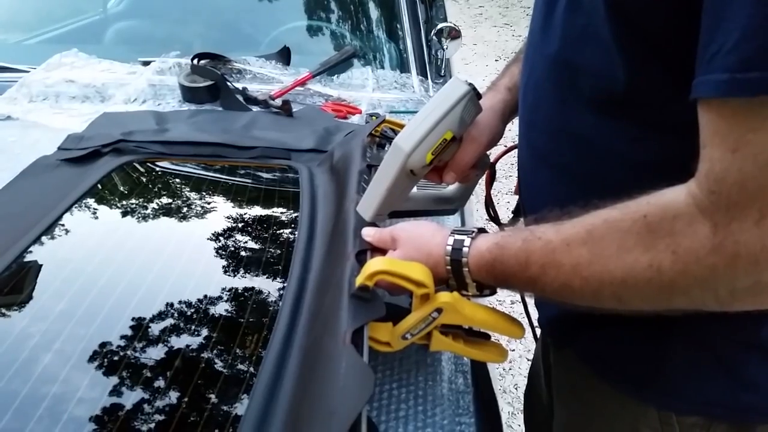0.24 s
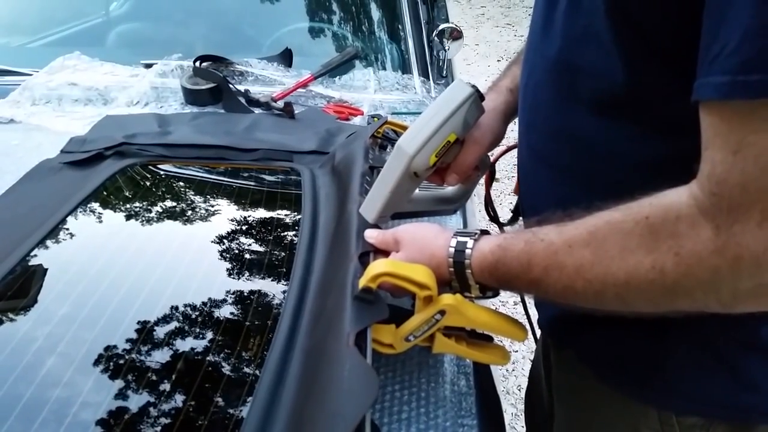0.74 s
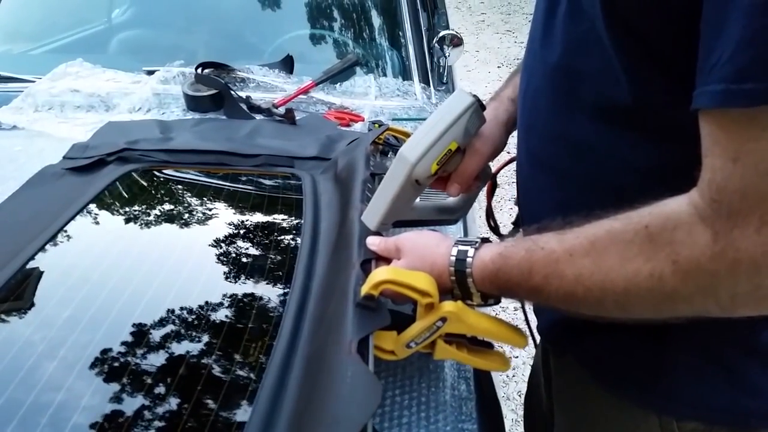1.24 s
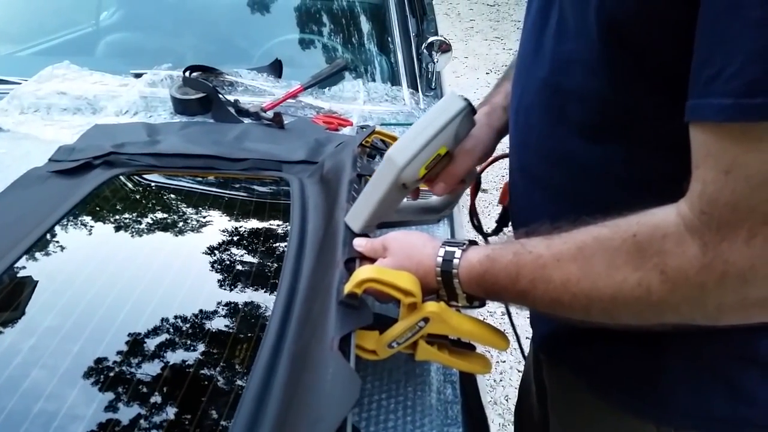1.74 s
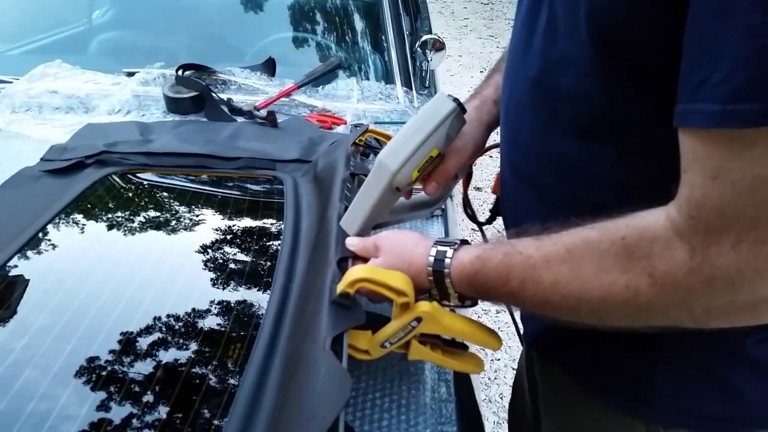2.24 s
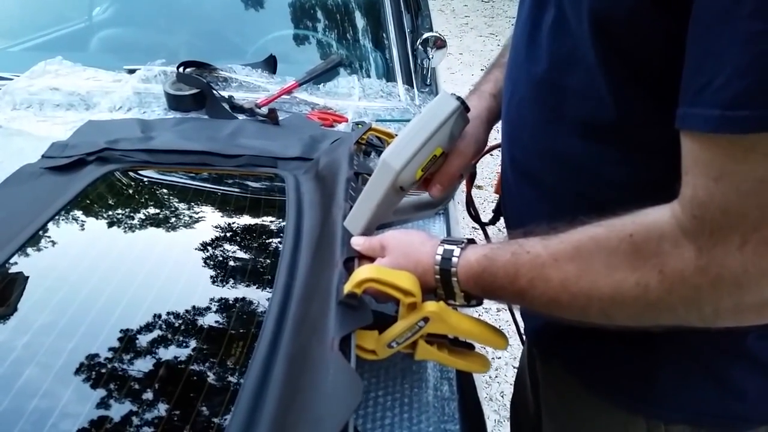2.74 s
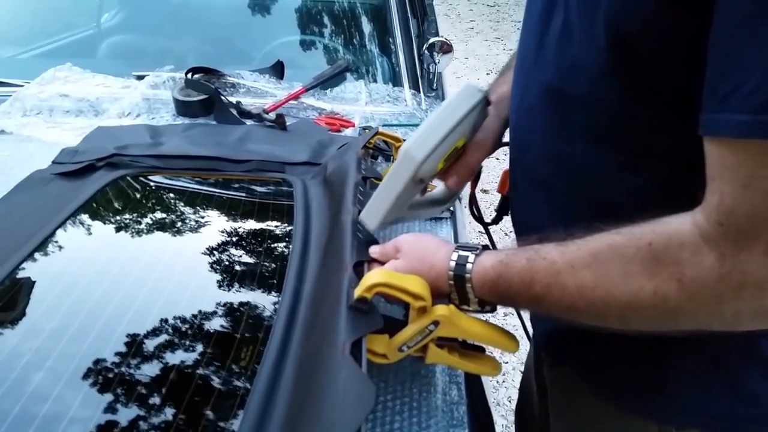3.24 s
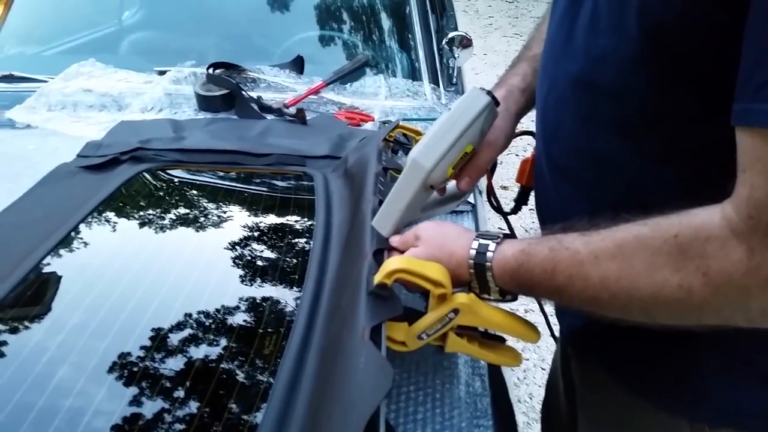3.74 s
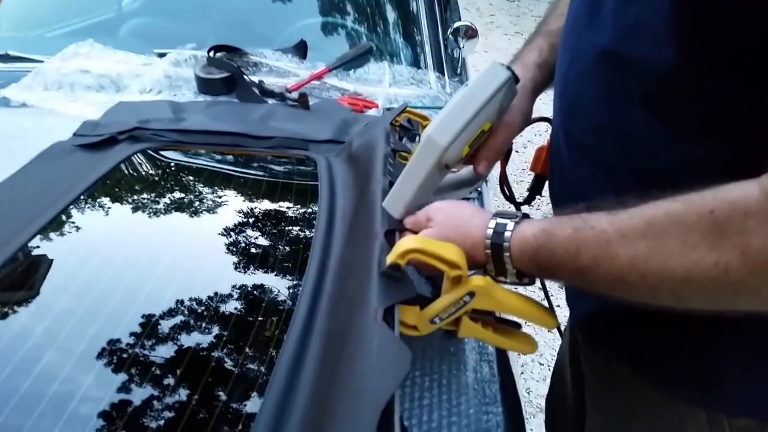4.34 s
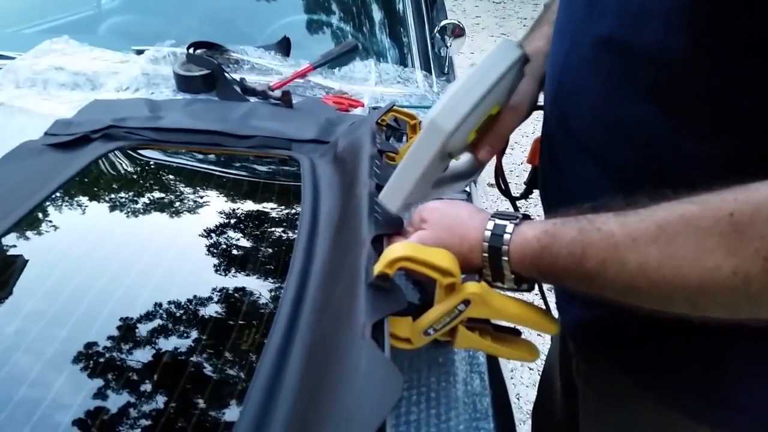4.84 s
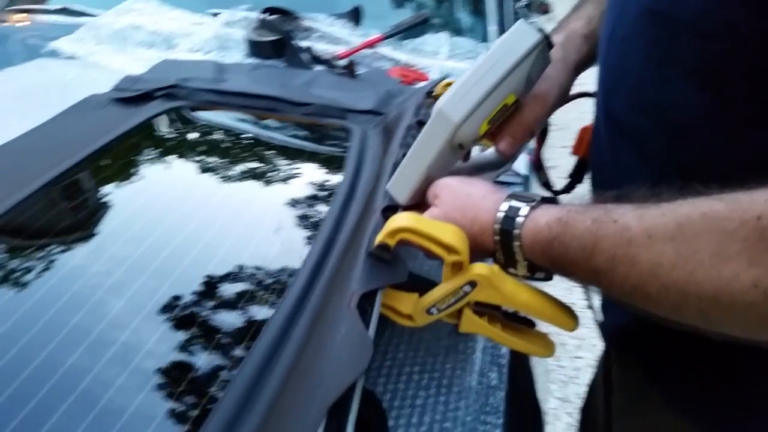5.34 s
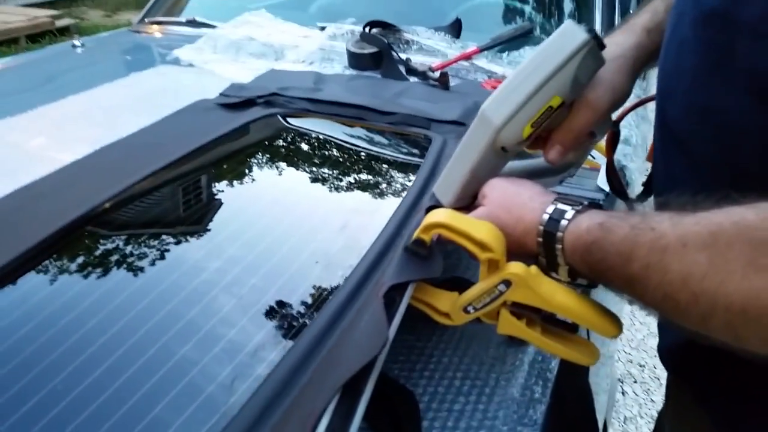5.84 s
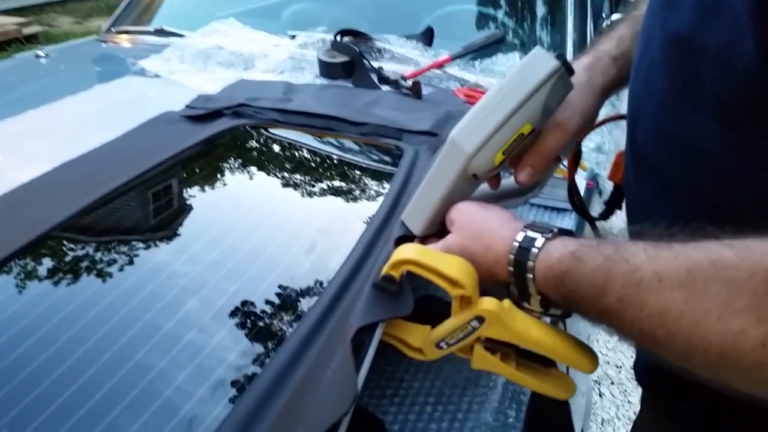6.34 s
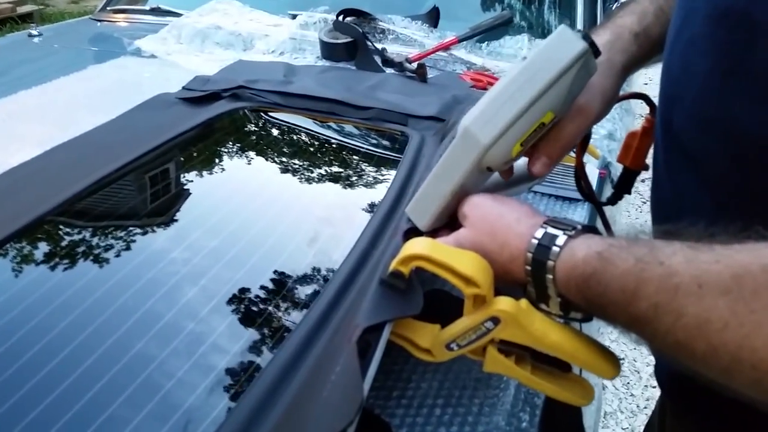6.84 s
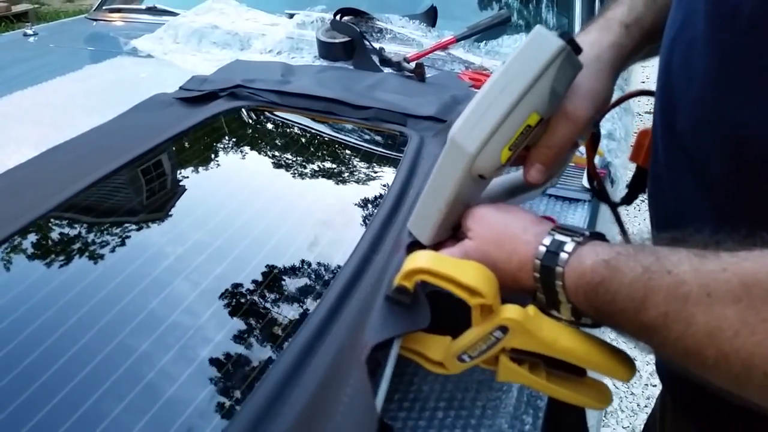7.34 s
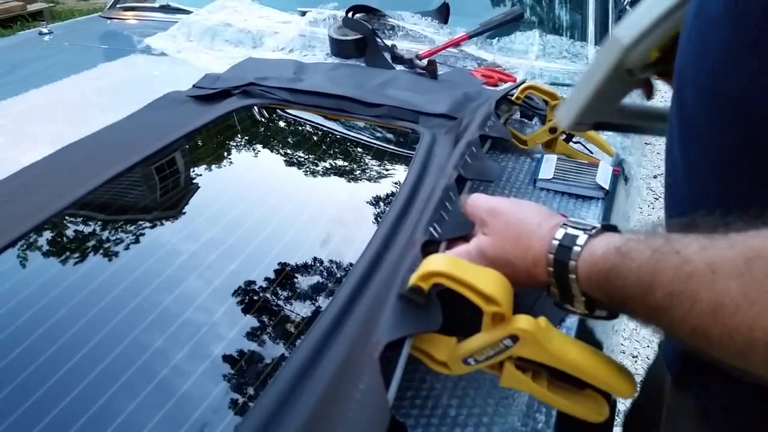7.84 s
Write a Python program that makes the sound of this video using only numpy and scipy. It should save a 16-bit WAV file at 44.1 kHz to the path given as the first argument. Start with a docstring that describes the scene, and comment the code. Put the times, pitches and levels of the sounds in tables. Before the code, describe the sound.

At the mouth of a garage, a close electric staple gun drives five evenly spaced staples into a vinyl car top. The hard, slightly overloaded snaps thump the car's panels and leave a short echo. Small clicks, dull bumps and vinyl rubbing fill the gaps, with one firmer knock before the last shot. Behind this lie a faint low rumble, buzzing insects and a far-off passing car, all dropping away after each snap.

```python
"""At the mouth of a garage, an electric staple gun fires five times into the vinyl top of a car.
The trigger clicks, a hard snap and a thump ring the car's panels, and the plunger clacks back.
In between, hands bump and rub the vinyl and the gun's nose ticks on it; the walls echo it all.
The town rumbles, insects call and a distant car goes by. An automatic volume control turns
everything down at each shot, so these outdoor sounds drop away and then swell back."""
import sys
import numpy as np
from scipy import signal
from scipy.fft import rfft, irfft
from scipy.io import wavfile
from scipy.ndimage import uniform_filter1d, minimum_filter1d, map_coordinates

SR = 44100
rng = np.random.default_rng(int(sys.argv[2]) if len(sys.argv) > 2 else 0)


def to_wav(sig):
    """Store sig (one row per channel, or 1-D mono) as 16-bit WAV at the path in sys.argv[1].

    Samples outside -1..1 are clipped; the rate is SR.
    """
    pcm = np.clip(np.atleast_2d(sig), -1, 1) * 32767
    pcm = np.round(pcm).astype(np.int16)
    wavfile.write(sys.argv[1], SR, pcm.T)  # frames by channels


N = 357142
TIME = np.arange(int(.8 * SR)) / SR  # the clock of one short sound, in seconds


def gain(db):
    """Turn decibels into a number to multiply a sound by."""
    return 10 ** (np.asarray(db) / 20)


def add(out, start_s, sound):
    """Mix a sound in from its start time."""
    i = max(int(start_s * SR), 0)
    out[:, i:i + sound.shape[-1]] += sound[..., :N - i]


def colour(x, tone, size=4096):
    """Shape a sound with a table of pitches and levels; white noise keeps its overall power."""
    hz, db = np.transpose(tone)
    curve = gain(np.interp(np.log(np.arange(size // 2 + 1) * SR / size + 1), np.log(hz), db))
    # build the filter so that it never rings before the sound arrives
    cepstrum = irfft(np.log(curve)) * (1 + np.sign(np.fft.fftfreq(size)))
    response = irfft(np.exp(rfft(cepstrum)))
    return signal.fftconvolve(x, response[None] / np.linalg.norm(response))[:, :x.shape[1]]


def noise(count, alike_hz=500):
    """Stereo noise whose left and right sides are alike below alike_hz."""
    mid, side = rng.standard_normal((2, count))
    side = signal.lfilter(*signal.butter(1, alike_hz, "high", fs=SR), side)
    return np.array([mid + side, mid - side]) / np.sqrt(2)


def wobble(rate_hz, count=len(TIME)):
    """A random wander, mostly between -1 and 1."""
    step = max(int(SR / rate_hz), 1)
    return uniform_filter1d(np.repeat(rng.standard_normal(count // step + 1), step), step)[:count]


def fade(fade_s):
    """Die away by 60 dB in fade_s seconds."""
    return gain(-60 * TIME / fade_s)


def ring(hz, fade_s):
    """One fading note of something struck."""
    return np.sin(2 * np.pi * hz * TIME) * fade(fade_s)


# the low rumble of town and engine (pitch [Hz], level [dB])
RUMBLE_TONE = [(20, -6), (60, 4), (120, 4), (200, -5.5), (300, -12), (600, -26), (1500, -56.5)]
# the rush of tyres on the road (pitch [Hz], level [dB])
TYRE_TONE = [(60, -18.5), (250, 2), (500, -1), (850, 13), (1050, 7.5), (1400, -10.5), (2400, -12.5),
             (3300, -28.5), (6500, -43), (13000, -37.5)]
def traffic(road_m=15, speed_m_s=24, nearest_s=7.05, town_db=-52, engine_db=-34, tyres_db=-38):
    """The town rumbles; one car's engine and tyres grow as it nears and fade as it leaves."""
    nearness = road_m / np.hypot(road_m, speed_m_s * (np.arange(N) / SR - nearest_s))
    rumble = colour(noise(N, alike_hz=160), RUMBLE_TONE) * gain(2.5 * wobble(3.8, N))
    rumble *= np.hypot(gain(town_db), gain(engine_db) * nearness)
    tyres = colour(noise(N, alike_hz=800), TYRE_TONE) * gain([[2], [-2]])  # a little to the left
    return rumble + tyres * gain(tyres_db) * nearness


# the drone of many insects (pitch [Hz], level [dB])
CHORUS_TONE = [(2500, -45), (3500, -13.5), (3950, 4), (4400, 3.5), (4800, 1.5), (5250, -23.5), (6600, -15),
               (7500, -35.5), (14000, -28)]
# the whine of the nearest insect (pitch [Hz], level [dB])
WHINE_TONE = [(3500, -43), (4400, -18.5), (4600, 0.5), (4740, 1.5), (4900, -16.5), (5300, -38.5),
              (8500, -51.5), (9400, -31), (10400, -47), (14000, -24)]
# that insect starts a call (time [s])
CALL_TIMES = [.45, 2.1, 3.35, 5.25, 6.8]
def insects(chorus_db=-65, call_db=-61.5, sharp_share=.029, sag_s=.3):
    """A chorus drones on while the nearest insect calls and rests, its pitch sagging in each call."""
    out = colour(noise(N), CHORUS_TONE) * gain(chorus_db + 1.2 * wobble(60, N))
    whine = colour(noise(N), WHINE_TONE) * gain(call_db + 2 * wobble(90, N))
    corners_s = np.cumsum([0, .3, .62, .45])  # swell, hold, fade
    t = np.arange(int(corners_s[-1] * SR)) / SR
    swell = np.interp(t, corners_s, [0, 1, 1, 0])
    position = np.cumsum(1 + sharp_share * np.exp(-t / sag_s))  # faster at first, so higher
    for s in CALL_TIMES:
        call = np.array([map_coordinates(side, [s * SR + position], mode="mirror") for side in whine])
        add(out, s, swell * call)
    return out * gain([[2], [-2]])  # a little to the left


def thump(hz, fade_s, left_db, lag_s):
    """The padded top gives under a push: a low swing that reaches the right side later."""
    swing = ring(hz, fade_s) * (1 - np.exp(-TIME / .00022))
    return np.array([gain(left_db) * swing, np.interp(TIME - lag_s, TIME, swing, left=0)])


# soft bumps on the car's top (time [s], level [dB])
SOFT_BUMPS = [(.008, -37.5), (1.915, -22), (2.478, -34), (3.44, -22.5), (3.59, -20), (3.956, -21),
              (4.237, -24.5), (7.312, -32)]
def bumps():
    """Hands and gun bump the padding, which answers with a dull thud."""
    out = np.zeros((2, N))
    for s, db in SOFT_BUMPS:
        add(out, s, gain(db) * thump(hz=112, fade_s=.07, left_db=8.5, lag_s=.00019))
    return out


# the tone of the garage's echo (pitch [Hz], level [dB])
ECHO_TONE = [(40, -1.5), (100, 2), (220, 0), (500, -2.5), (1000, -4), (2500, -3), (4400, -8.5), (7000, 4),
             (10000, 2), (14500, 0)]
def garage_echo(x, bass_fade_s=.67, mid_fade_s=.61, treble_fade_s=.42):
    """Sound bounces off the walls: separate echoes blur into a wash, and the bass lasts longest."""
    bounces_db = 3 * wobble(220) + 7 * np.exp(-TIME / .06) * wobble(2500)
    wash = noise(len(TIME), alike_hz=296) * gain(bounces_db)
    bass, below_treble, treble = (signal.sosfilt(signal.butter(2, hz, kind, fs=SR, output="sos"), wash)
                                  for hz, kind in [(300, "low"), (6000, "low"), (6000, "high")])
    mid = below_treble - bass
    tail = bass * fade(bass_fade_s) + mid * fade(mid_fade_s) - treble * fade(treble_fade_s)
    build_up = np.clip((TIME - .004) / .015, 0, 1)
    tail = colour(tail * build_up, ECHO_TONE)
    return signal.fftconvolve(x, tail / np.sqrt(np.sum(tail ** 2) / 2), axes=1)[:, :N]


def chatter(lead_s, rise_s, stay_s, fall_s, rough_db):
    """A crowd of tiny hits builds up to the contact at lead_s, stays a moment and dies away."""
    t = TIME - lead_s
    shape = np.exp(np.minimum(t, 0) / rise_s - np.maximum(t - stay_s, 0) / fall_s)
    hits = noise(len(t), alike_hz=300) * shape * gain(rough_db * wobble(2500))
    return hits * np.sqrt(np.sum(shape ** 2) / np.mean(np.sum(hits ** 2, axis=1)))


# a light click of the gun (pitch [Hz], level [dB])
CLICK_TONE = [(100, -13), (1000, 0.5), (2600, 8.5), (4200, 5), (6000, -15.5), (8500, -7), (11500, 4.5),
              (14500, -1.5)]
# a knock on the strip under the vinyl that takes the staples (pitch [Hz], level [dB])
STRIP_TONE = [(60, -12.5), (300, -9), (600, -4), (950, 5.5), (1350, -3), (1800, -17.5), (2700, -18.5),
              (3800, -37), (14000, -49.5)]
TICK_LEAD_S = .004
def tick(click_db, knock_db):
    """One light contact: a bright click from the gun and a dull knock from the strip."""
    contact = chatter(TICK_LEAD_S, rise_s=.0012, stay_s=.00041, fall_s=.0013, rough_db=1)
    return gain(click_db) * colour(contact, CLICK_TONE) + gain(knock_db) * colour(contact, STRIP_TONE)


# the gun's nose touches down (time [s], click level [dB], knock level [dB])
NOSE_TAPS = [(0.0487, -46, -44), (1.965, -34.5, -36), (3.578, -36, -35.5), (4.2496, -23, -39.5),
             (5.074, -39.5, -28), (5.149, -43, -26), (5.581, -37, -38), (5.703, -43.5, -25.5),
             (5.811, -40, -28.5), (5.868, -48.5, -32.5), (5.921, -47.5, -30), (6.627, -24.5, -1.5),
             (6.876, -38, -28.5)]
def nose_taps():
    """The gun's nose taps the strip as it is put in place."""
    out = np.zeros((2, N))
    for s, click_db, knock_db in NOSE_TAPS:
        add(out, s - TICK_LEAD_S, tick(click_db, knock_db))
    return out


# the trigger is pulled (time [s], click level [dB])
TRIGGER_PULLS = [(1.113, -37.5), (2.94, -38), (4.5295, -34.5), (6.01, -27.5), (7.4115, -31)]
def trigger(knock_db=-46, slack_s=.013, slack_db=-14.5):
    """The trigger takes up its slack with a lighter tick, then clicks."""
    out = np.zeros((2, N))
    for s, click_db in TRIGGER_PULLS:
        add(out, s - slack_s - TICK_LEAD_S, gain(slack_db) * tick(click_db, knock_db))
        add(out, s - TICK_LEAD_S, tick(click_db, knock_db))
    return out


# the notes of the gun's case and steel staple holder (pitch [Hz], width [Hz], level [dB])
BODY_NOTES = [(1374, 46, -5.5), (1530, 240, -1), (1910, 64, -1), (2490, 710, -3), (4010, 46, -2),
              (4610, 250, -3.5), (10800, 100, -7.5), (11940, 900, -2.5), (13700, 600, -3.5)]
# the overall tone of the snap (pitch [Hz], level [dB])
SNAP_TONE = [(40, -19.5), (250, 3), (500, 2), (1100, -3), (2000, -7), (3200, -7.5), (4400, -2.5),
             (5600, -14), (7500, -12), (9500, -4.5), (11000, -1.5), (14500, -7.5)]
def gun_body(hits):
    """Hits inside the gun make its case and steel parts ring."""
    ringing = sum(gain(db) * signal.lfilter(*signal.iirpeak(hz, hz / width_hz, fs=SR), hits)
                  for hz, width_hz, db in BODY_NOTES)
    return colour(hits + ringing, SNAP_TONE)


def strip_knock(hz, fade_s=.032, upper_db=-6):
    """The struck strip gives three short notes, each shared differently between left and right."""
    upper_notes = [gain(upper_db) * ring(hz * ratio, fade_s) for ratio in (1.4, 1.1)]
    shares = 1 + .35 * rng.standard_normal((2, 3))
    return shares @ np.array([ring(hz, fade_s), *upper_notes])


# the notes of the car's top (pitch [Hz], level [dB], fade time before the vinyl settles [s])
PANEL_NOTES = [(97.5, -10, 0.5), (121.6, -3.5, .65), (146.4, -8.5, 0.56), (174.4, -7.5, 0.5),
               (202.3, -9, 0.87), (235, -13.5, .4), (348, -12, 0.54), (400, -11.5, .42), (475, -16, .35)]
def car_panels(waver_db=3, settle_after_s=.22, settle_fade_s=.73):
    """The panels waver as loose vinyl touches and leaves them, and die faster once it settles."""
    notes = np.zeros(len(TIME))
    for hz, db, fade_s in PANEL_NOTES:
        level = gain(db + waver_db * wobble(28))
        notes += level * ring(hz * (1 + .015 * rng.standard_normal()), fade_s)
    build_up = 1 - np.exp(-TIME / .021)
    settle = gain(-60 * np.maximum(TIME - settle_after_s, 0) / settle_fade_s)
    return notes * build_up * settle * gain([[-6], [0]])  # quieter on the left


# the five shots (time [s], snap level [dB], knock level [dB], knock pitch [Hz],
# thump level [dB], thump pitch [Hz], panel level [dB], echo level [dB])
STAPLE_SHOTS = [(1.272, 12.5, 10, 627, 22.5, 115, 1, -7.5), (2.9886, 15, 3, 870, 21.5, 140.1, 5, -8),
                (4.5557, 17.5, 9, 863, 23.5, 80.3, -15.5, -10.5),
                (6.0386, 19, 9.5, 711, 26.5, 188, -14.5, -5), (7.439, 17, 12.5, 949, 24.5, 161, -26, -8.5)]
# the plunger, which drives the staple, lands back on its stop (time [s])
RETURN_TIMES = [1.2991, 3.0149, 4.5804, 6.0609, 7.4598]
def staple_gun(lead_s=.012, return_snap_db=4, return_knock_db=5, padding_db=-6):
    """The plunger slides, drives the staple home and springs back; the car and garage ring on."""
    out, to_walls = np.zeros((2, 2, N))
    for shot, back_s in zip(STAPLE_SHOTS, RETURN_TIMES):
        s, snap_db, knock_db, knock_hz, thump_db, thump_hz, panel_db, echo_db = shot
        snaps, thuds = np.zeros((2, 2, N))
        blow = chatter(lead_s, rise_s=.0017, stay_s=.0019, fall_s=.0028, rough_db=4.5)
        add(snaps, s - lead_s, gain(snap_db) * gun_body(blow))
        add(thuds, s - .001, gain(knock_db) * strip_knock(knock_hz))
        add(thuds, s - .001, gain(thump_db) * thump(thump_hz, fade_s=.02, left_db=-6, lag_s=.0015))
        # the return is a longer slide and a lighter blow
        clack = chatter(lead_s, rise_s=.0027, stay_s=.00094, fall_s=.009, rough_db=.5)
        add(snaps, back_s - lead_s, gain(return_snap_db) * gun_body(clack))
        add(thuds, back_s - .0005, gain(return_knock_db) * strip_knock(hz=905))
        out += snaps + thuds
        add(out, s, gain(panel_db) * car_panels())
        # thuds come from under the padding: strong close by, weak at the walls
        to_walls += gain(echo_db) * (snaps + gain(padding_db) * thuds)
    return out + garage_echo(to_walls)


# a hand pulls and rubs the vinyl (middle time [s], length [s], rub level [dB], scrape level [dB])
HAND_STROKES = [(4.071, 0.25, -31.5, -64), (4.197, .14, -28, -37.5), (4.3, .3, -42, -64),
                (5.086, .09, -44, -39.5), (5.161, .09, -30.5, -44.5), (5.82, .45, -53, -56.5),
                (7.299, 0.47, -43.5, -62)]
# the dull rub (pitch [Hz], level [dB])
RUB_TONE = [(40, -1.5), (160, 9), (400, 0), (850, 0.5), (1400, -13.5), (2500, -23.5), (4000, -34.5),
            (7000, -48), (14500, -44)]
# the dry scrape (pitch [Hz], level [dB])
SCRAPE_TONE = [(200, -8.5), (1000, 2), (2500, 1.5), (4000, -11), (6000, -25), (8300, -12.5), (11800, -3),
               (14500, -5)]
def vinyl_rubs():
    """A hand slides over vinyl: each stroke swells and eases off, gripping and slipping on the way."""
    out = np.zeros((2, N))
    for middle_s, length_s, rub_db, scrape_db in HAND_STROKES:
        swell = np.sin(np.pi * np.minimum(TIME / length_s, 1)) ** 2
        grip = gain(2.5 * wobble(400) + 1.2 * wobble(35))
        rub = gain(rub_db) * colour(noise(len(TIME)), RUB_TONE)
        scrape = gain(scrape_db) * colour(noise(len(TIME)), SCRAPE_TONE)
        add(out, middle_s - length_s / 2, swell * grip * (rub + scrape))
    return out


def scene(hands_echo_db=-14):
    """The gun, the hands with their echo, and the world outside."""
    shots = staple_gun()
    hands = trigger() + nose_taps() + bumps() + vinyl_rubs()
    return shots + hands + gain(hands_echo_db) * garage_echo(hands) + traffic() + insects()


def volume_control(x, limit_db=-3, max_cut_db=25, hold_s=.89, recover_db_per_s=41):
    """A loud peak pulls the volume down just before it lands; the volume waits, then creeps back."""
    over_db = 20 * np.log10(np.abs(x).max(axis=0) + 1e-9) - limit_db
    half_hold = int(hold_s * SR / 2)
    held_db = minimum_filter1d(-np.clip(over_db, 0, max_cut_db), 2 * half_hold + 1, origin=half_hold)
    ramp_db = recover_db_per_s * np.arange(N) / SR
    volume_db = ramp_db + np.minimum.accumulate(held_db - ramp_db)
    ahead, smoothing = int(.012 * SR), int(.003 * SR)
    early_db = np.pad(volume_db, (0, ahead), "edge")[ahead:]
    return x * gain(uniform_filter1d(early_db, smoothing))


def record(dry, hiss_db=-84, low_noise_db=-62, low_cut_hz=32, top_cut_hz=14700):
    """Control the volume, add faint steady noise, and trim the deepest bass and highest treble."""
    wet = volume_control(dry) + gain(low_noise_db) * colour(noise(N, alike_hz=100), RUMBLE_TONE)
    wet = signal.lfilter(*signal.butter(1, low_cut_hz, "high", fs=SR), wet)
    wet += gain(hiss_db) * rng.standard_normal((2, N))
    wet = np.clip(wet, -1, 1)  # the snaps overload
    return signal.sosfilt(signal.ellip(12, .2, 90, top_cut_hz, fs=SR, output="sos"), wet)


dry = scene()
out = record(dry)
to_wav(out)
```